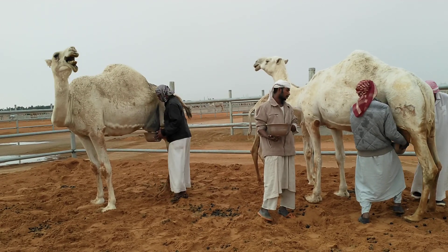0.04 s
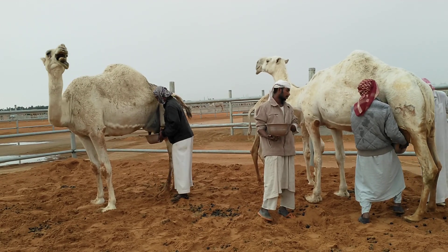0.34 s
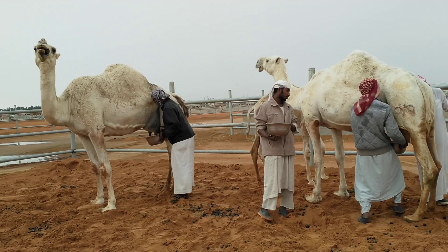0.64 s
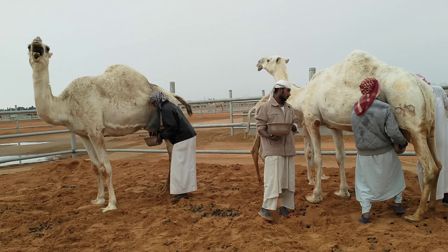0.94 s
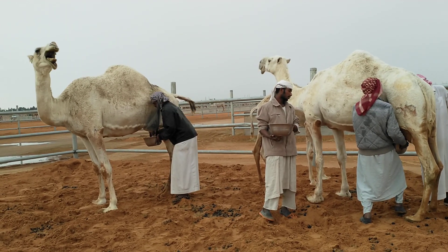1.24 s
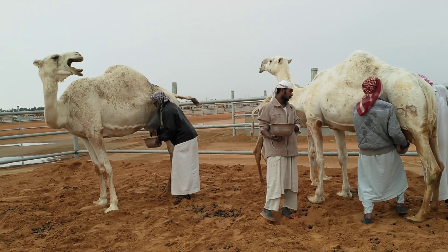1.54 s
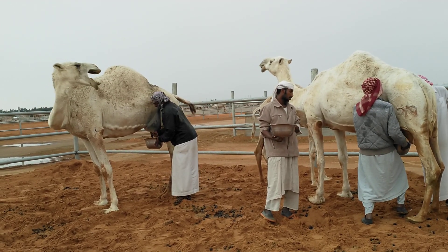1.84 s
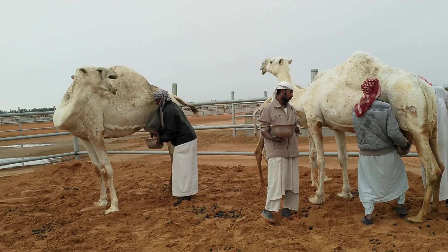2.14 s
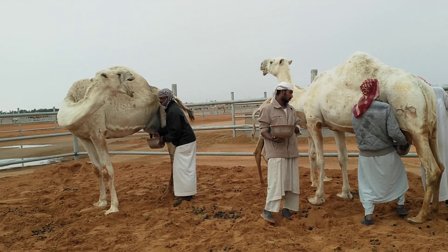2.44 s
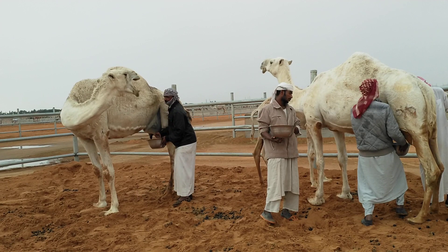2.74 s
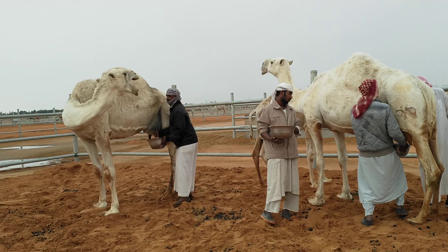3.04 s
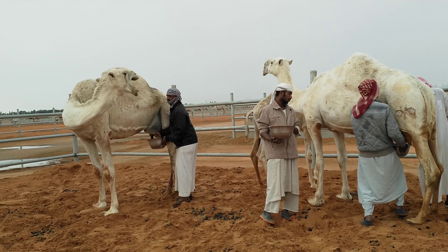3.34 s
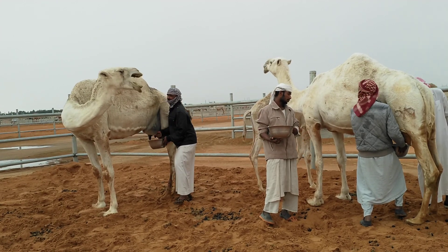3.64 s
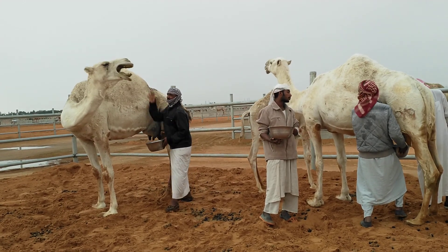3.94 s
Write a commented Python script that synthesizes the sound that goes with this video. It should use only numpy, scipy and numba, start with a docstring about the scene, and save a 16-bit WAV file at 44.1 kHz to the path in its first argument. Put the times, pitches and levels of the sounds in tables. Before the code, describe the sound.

A camel groans low and raspy, close and slightly left, fading by 0.7 seconds. A distant bird chirps faintly in the pause. At about 1.2 seconds the camel groans again, rising a little in pitch, and from 2 seconds breaks into a louder gargling, gulping bellow that smooths out just before 4 seconds. Faint rustles and ticks of gear come near the end, with light wind rumbling throughout.

```python
"""A camel groans twice in an open sandy pen; the second groan breaks into a loud gargling bellow
as it bends its neck back. Vocal-fold pulses, even at first and then chaotic, ring the moving
resonances of its long throat, and air rasps with each pulse. It stands left of centre, with a short
scatter off the pen. Behind it a small bird chirps, gear rustles and ticks, and light wind rumbles."""
import sys
import numpy as np
from scipy import signal
from scipy.fft import rfft, irfft
from scipy.io import wavfile
from scipy.ndimage import uniform_filter1d, map_coordinates
from numba import njit

SR = 44100
rng = np.random.default_rng(int(sys.argv[2]) if len(sys.argv) > 2 else 0)


def digitize_waveform(pressure):
    """Quantize a signal to 16-bit integers and store it at the path in sys.argv[1].

    Rows of a 2-D input are taken as channels; values are limited to [-1, 1].
    """
    field = np.atleast_2d(pressure).T
    bounded = np.clip(field, -1, 1)
    quanta = np.round(bounded * 32767).astype(np.int16)
    wavfile.write(sys.argv[1], SR, quanta)


N = 176400
T = np.arange(N) / SR

# pitch of the vocal folds: t/s, f/Hz
FOLD_PITCH = [(0, 96.84), (.126, 94.45), (.326, 100.1), (.444, 101.7), (.504, 100.9), (.554, 97.5),
              (.6, 91.76), (1.18, 74.76), (1.23, 81.6), (1.28, 90.9), (1.34, 95.7), (1.38, 104.4),
              (1.48, 105.8), (1.694, 105.6), (1.84, 100.5), (2.1, 99.97), (2.5, 88.1), (3.7, 88.64),
              (3.85, 87.84), (4, 86.3)]
# grit of the folds: t/s, roughness/0-1
FOLD_ROUGHNESS = [(0, .008), (.57, .008), (.62, .6), (1.15, .6), (1.19, .15), (1.34, .2), (1.38, .012),
                  (1.69, .012), (1.72, .25), (1.9, .35), (1.97, .5), (2.01, .2), (2.12, .3), (2.25, 1),
                  (3.68, .9), (3.8, .18), (3.92, .07), (4, .05)]
# gulps, where the folds catch and burst open: t/s, pulse accent/dB, first-formant boom/dB
GULP_HITS = [(1.989, 4, -2.5), (2.301, 1.5, -1), (2.378, 3, 2), (2.505, 1, 1), (2.564, 8, -3.5),
             (2.677, 1, -3.5), (2.805, 3, -5), (2.898, 4.5, 0), (3.181, 1.5, 3), (3.318, -0.5, 6.5),
             (3.402, 0, 4.5), (3.463, 4, -8.5), (3.585, 0.5, 2), (3.608, -4, 8), (3.678, 3.5, 3.5)]
# glide of the four throat formants: t/s, f1/Hz, f2/Hz, f3/Hz, f4/Hz
FORMANT_GLIDE = [(0, 293, 716, 1154, 1347), (.2, 304, 706, 1148, 1350), (.4, 308, 719, 1140, 1283),
                 (.56, 285.2, 673, 1102, 1244), (1.2, 350, 691, 1160, 1413), (1.3, 363, 749, 1120, 1369),
                 (1.42, 384, 760, 1141, 1296), (1.67, 386.2, 789, 1218, 1473), (1.8, 420, 794, 1235, 1410),
                 (2.05, 459, 807, 1124, 1286), (2.2, 440, 822, 1142, 1206), (2.4, 417, 860, 1130, 1310),
                 (2.5, 434, 820, 1137, 1275), (3.3, 438.5, 848, 1152, 1310), (3.7, 447, 845, 1153, 1287),
                 (3.85, 404, 813, 1154, 1340), (4, 363, 690, 1175, 1410)]
# their shapes, a row each: width/Hz, skirt/Hz, gain/dB
FORMANT_SHAPES = [(49.7, 1500, 2.5), (63, 250, 3.5), (63.6, 85, -3), (68, 430, -5)]
# extra throat resonances that open in the gargle: f/Hz, width/Hz, skirt/Hz, gain/dB
GARGLE_FORMANTS = [(440, 39, 200, -11), (500, 13, 440, -6.5), (692, 150, 97, -11.5)]
# upper throat resonances: f/Hz, width/Hz, gain/dB
UPPER_FORMANTS = [(1834, 120, 0.5), (2156, 71, -7)]
# faders of the calls: t/s, formant 1/dB, formant 2/dB, formants 3 and 4/dB, upper formants/dB, rasp/dB
GROAN_1_FADERS = [(0.0, -34.5, -41, -32.5, -59.5, -66), (0.114, -39, -41, -36, -54.5, -68.5),
                  (0.438, -32.5, -33, -31.5, -48, -65), (0.526, -31.5, -34.5, -34.5, -49, -60.5),
                  (0.574, -36, -43, -34, -50, -59), (0.608, -42.5, -51, -59, -68, -65),
                  (0.66, -55, -61.5, -53, -66, -66.5), (0.7, -73, -77, -69, -82, -83)]
GROAN_2_FADERS = [(1.1, -85, -72, -84, -94, -88), (1.15, -62, -54.5, -59, -93, -102),
                  (1.196, -40, -42, -38, -52, -76), (1.256, -39, -37, -33.5, -58.5, -62.5),
                  (1.414, -32.5, -33.5, -27.5, -59, -60), (1.524, -34, -31.5, -28.5, -56.5, -65.5),
                  (1.778, -33.5, -32, -35.5, -68.5, -61.5), (1.898, -30.5, -34.5, -38.5, -51, -64),
                  (2.02, -25.5, -27.5, -36.5, -57, -65)]
BELLOW_FADERS = [(2.06, -26.5, -26, -37.5, -55, -62.5), (2.188, -25.5, -30.5, -40, -55, -61.5),
                 (2.286, -29.5, -38.5, -52.5, -58, -62), (2.302, -24, -29.5, -52, -55.5, -59),
                 (2.422, -26.5, -39, -48.5, -56.5, -61), (2.448, -28, -36, -45, -45, -60),
                 (2.476, -28, -30, -45.5, -63, -61.5), (2.508, -21, -31.5, -41.5, -51, -59),
                 (2.53, -24, -31.5, -47.5, -55, -58), (2.82, -23.5, -32, -37, -53.5, -59),
                 (2.918, -23.5, -32.5, -40, -55.5, -57.5), (3.296, -25, -32.5, -38.5, -59, -62),
                 (3.642, -25, -34.5, -40, -58, -62.5), (3.87, -29, -32, -35, -54.5, -62.5),
                 (4.0, -29.5, -30.5, -30.5, -57, -60)]
# EQ of the mouth, before and after the neck bends: f/Hz, gain/dB
MOUTH_EARLY_EQ = [(1410, -29), (2400, -4.5), (2690, -15.5), (3260, -0.5), (3860, -8), (3980, -27),
                  (4170, -11.5), (5450, 6), (6020, -5), (6710, -2), (7300, -16.5), (8000, -12),
                  (8700, -18.5), (13500, -26.5), (15000, -21.5)]
MOUTH_BENT_EQ = [(1410, -16), (2400, 7), (2840, -4.5), (3070, -6), (3260, 1.5), (3470, -11.5), (3800, -3.5),
                 (4200, -8), (5090, -7.5), (5540, -11.5), (6020, -7.5), (6550, -3.5), (7700, -11.5),
                 (9610, -15.5), (11000, -26.5), (14100, -25), (15000, -22)]
# start and end of the crossfade between the two: t/s
MOUTH_CROSSFADE = [1.58, 2.5]
# narrow wandering mouth resonances: f/Hz, width/Hz, level against the rasp/dB
MOUTH_PEAKS = [(2700, 400, -9), (4050, 600, -19), (5700, 250, -15)]
# brief rings of mouth and throat: t/s, length/s, f/Hz, width/Hz, level/dB
CROAK_HITS = [(0.487, 0.093, 5580, 400, -56), (1.18, 0.07, 2440, 170, -46), (1.173, 0.11, 3025, 390, -53),
              (1.193, 0.22, 4640, 260, -60.5), (1.3, 0.25, 6200, 900, -59.5),
              (1.601, 0.24, 5200, 1800, -59), (1.253, 0.042, 374, 72, -30.5), (2.1, 0.17, 2500, 270, -54.5),
              (3.3, 0.053, 2750, 300, -56.5)]
# head position: t/s, left bass lead/ms, left treble lead/ms, treble L-R/dB, turned away/0-1
HEAD_PATH = [(0, 0.2, 0.26, 7, 0.69), (.6, 0.22, 0.22, 8, 0.7), (1.3, 0.21, 0.24, 6.5, 0.1),
             (1.7, 0.12, 0.32, 4.5, 0.43), (2.2, 0.073, 0.21, 3, 1), (3.72, 0.051, 0.2, 2.5, 1),
             (4, 0.14, 0.19, 3, 0.5)]
# bird chirps: t/s, length/s, start f/Hz, end f/Hz, level/dB
BIRD_NOTES = [(.69, .08, 4400, 3200, -78), (.98, .09, 3350, 3500, -84), (1.06, .065, 3500, 2350, -76)]
# rustles and ticks of gear: t/s, length/s, f/Hz, width/Hz, level/dB
GEAR_HITS = [(3.275, .075, 13600, 2200, -67), (3.703, .005, 7600, 1300, -51), (2.872, .025, 4050, 600, -57),
             (3.817, .004, 4500, 1900, -53)]
# EQ of the distant air and of the wind: f/Hz, gain/dB
AIR_EQ = [(88, -30.5), (150, -5.5), (229, -6), (416, -13), (687, -10.5), (1700, -28.5), (2020, -24.5),
          (2650, -33), (10800, -47), (15000, -43)]
WIND_EQ = [(20, -19), (42, -4), (70, -0.5), (110, -5.5), (170, -16), (300, -20.5)]
# wind fader: t/s, level/dB
WIND_FADER = [(0, -46), (.3, -53), (.7, -52), (.9, -56.5), (1.15, -51), (1.4, -52), (2.3, -51), (3.2, -56),
              (4, -47)]


def camel():
    """Fold pulses and puffs of air ring the throat and chest and rasp through the mouth."""
    fade_s, silent_db = .065, -93
    breath_db, throat_db, rasp_db, chest_db = -27, .5, 4.5, -25.5  # trims
    (pitch,), (rough,), turned = curve(FOLD_PITCH), curve(FOLD_ROUGHNESS), curve(HEAD_PATH)[3]
    pause_s = GROAN_1_FADERS[-1][0] + fade_s, GROAN_2_FADERS[0][0] - fade_s
    pause = [(t,) + (silent_db,) * 5 for t in pause_s]
    *formant_levels, rasp_level = undb(curve([*GROAN_1_FADERS, *pause, *GROAN_2_FADERS, *BELLOW_FADERS]))
    pulses, puff = folds(pitch, rough)
    source = unit(pulses + flaps(rough))
    source += undb(breath_db) * (1 + 16 * rough) * puff * noise()
    body = throat(source, formants(formant_levels, rough, turned))
    rasp = (1 - turned) * unit(pulses) + (puff + .5 * turned ** 2) * noise()
    return (undb(throat_db) * body + croaks(source)
            + undb(rasp_db) * rasp_level * mouth(rasp, turned)
            + undb(chest_db) * formant_levels[0] * chest(source, turned))


def folds(pitch, rough):
    """One pulse and one puff of air a cycle; roughness scatters timing and force, gulps catch a pulse."""
    jitter, shimmer_db, catch_s, puff_s = .19, 1.6, .009, .005
    pulses, at, gulps = np.zeros(N + 16), 0., list(GULP_HITS)
    for slip, force in rng.standard_normal((700, 2)):
        if at >= N:
            break
        db = shimmer_db * rough[int(at)] * min(force, 1.5)
        if gulps and at / SR > gulps[0][0] - catch_s:
            start, db, _ = gulps.pop(0)
            at = start * SR
        i = int(at)
        click = np.sinc(np.arange(16) - 7 - at + i) * np.hanning(16)  # lands between samples
        pulses[i:i + 16] += undb(db) * click
        at += SR / pitch[min(i + 220, N - 1)] * np.exp(jitter * rough[i] * slip)
    puff = signal.lfilter([1], [1, -np.exp(-1 / (SR * puff_s))], pulses[:N])
    return pulses[:N], unit(puff)


def flaps(rough, per_s=150, size=.33):
    """Loose throat tissue slaps at random between the pulses where the voice is rough."""
    return size * rough ** 2 * (rng.random(N) < per_s / SR)


def formants(levels, rough, turned):
    """Throat resonances as (centre, width, skirt, level): gargling wobbles them, gulps shift the boom."""
    wobble, wobble_per_s, gulp_s, upper_trim_db = .035, 28, .014, 3
    first, second, third, upper = levels
    boom = undb(sum(db * (np.abs(T - t) < gulp_s / 2) for t, _, db in GULP_HITS))
    damping = 1 + .6 * (1 - turned)  # an open mouth facing out widens the resonances
    faders = first * boom, second, third, third
    rings = []
    for hz, (width, skirt, db), fader in zip(curve(FORMANT_GLIDE), FORMANT_SHAPES, faders):
        centre = hz * (1 + wobble * rough * walk(wobble_per_s))
        rings.append((centre, width * damping, skirt, undb(db) * fader))
    for hz, width, skirt, db in GARGLE_FORMANTS:
        rings.append((hz, width, skirt, undb(db) * first * np.maximum(turned, .4)))
    for hz, width, db in UPPER_FORMANTS:
        rings.append((hz, width * (1 + 1.9 * rough), 240, undb(upper_trim_db + db) * upper))
    return rings


def throat(source, rings):
    """One long tube with moving resonances: each pulse starts them all at once, and the lows trail."""
    hop, size = 294, 4096
    low_edge, high_edge = .83, 1.434  # passband of a resonance, as ratios of its centre
    f = np.fft.rfftfreq(size, 1 / SR) + 1
    per_frame = lambda v: (v + np.zeros(N))[hop // 2::hop, None]
    bell = lambda hz, width: 1 / (1 + ((f * f - hz * hz) / (f * width)) ** 2)
    power = 0
    for hz, width, skirt, level in rings:
        gain = per_frame(level / slow_level(resonate(source, hz, width, skirt)))
        centre = per_frame(hz)
        edges = 1 + (low_edge * centre / f) ** 12 + (f / (high_edge * centre)) ** 12
        power += gain ** 2 * bell(centre, per_frame(width)) * bell(centre, per_frame(skirt)) / edges
    # minimum phase keeps the attack sharp, with all the ringing after it
    floor = 3e-9 * power.max(axis=1, keepdims=True)
    cepstrum = irfft(np.log(power + floor))[:, :size // 2]
    cepstrum[:, 0] /= 2
    response = np.exp(rfft(cepstrum, size))
    frames = irfft(rfft(source.reshape(-1, hop), size) * response)
    out = np.zeros(N + size)
    for k, frame in enumerate(frames):
        out[k * hop:k * hop + size] += frame
    return out[:N]


def mouth(rasp, turned):
    """The rasp morphs between two mouth shapes; narrow peaks wander in it as the neck bends."""
    drift, swing_db, per_s = .02, 4, 7
    blend = np.interp(T, MOUTH_CROSSFADE, [0, 1])
    hiss = (1 - blend) * steady(colour(rasp, MOUTH_EARLY_EQ))
    hiss += blend * steady(colour(rasp, MOUTH_BENT_EQ))
    for hz, width, db in MOUTH_PEAKS:
        centre = hz * (1 + drift * walk(per_s))
        level = turned ** 3 * undb(db + swing_db * walk(per_s))
        hiss += level * steady(resonate(rasp, centre, width, skirt=830))
    return steady(hiss)


def croaks(source):
    """Single mouth and throat resonances ring out briefly."""
    return sum(undb(db) * swell(start, length) * steady(resonate(source, hz, width, width))
               for start, length, hz, width, db in CROAK_HITS)


def chest(source, turned):
    """A low chest resonance adds weight and rises as the head turns away."""
    return steady(resonate(source, hz=100 + 60 * turned ** 4, width=72, skirt=100))


def place_left(voice, shadow_hz=600, split_hz=1210):
    """The voice arrives earlier and brighter on the left; bass and treble have their own delays."""
    bass_ms, treble_ms, pan_db, _ = curve(HEAD_PATH)
    below = lambda x, hz, order: signal.sosfiltfilt(signal.butter(order, hz, fs=SR, output="sos"), x)
    delay = lambda x, ms: map_coordinates(x, [(T - ms / 1000) * SR], mode="nearest")
    low = below(voice, shadow_hz, order=1)
    left, right = (low + (voice - low) * undb(side * pan_db / 2) for side in (1, -1))
    bass = below(right, split_hz, order=3)
    return np.array([left, delay(bass, bass_ms) + delay(right - bass, treble_ms)])


def pen(x, wet_db=-6, treble_db=9, t60_s=.087):
    """Scatter from rails and animals: bright and wide on top, centred in the bass."""
    decay = undb(-60 * T / t60_s) * np.clip(T / .003, 0, 1)
    bass = cut(noise(), 720, "low")
    tails = [decay * (bass + undb(treble_db) * cut(noise(), 920, "high")) for _ in range(2)]
    return undb(wet_db) * np.array([signal.fftconvolve(x, t / np.linalg.norm(t))[:N] for t in tails])


def bird():
    """Thin, wavering whistles glide far off."""
    out = np.zeros(N)
    for start, length, start_hz, end_hz, db in BIRD_NOTES:
        level = undb(db + 3.9 * walk(93)) * swell(start, length)
        hz = np.interp(T, [start, start + length], [start_hz, end_hz]) * (1 + .014 * walk(330))
        out += level * np.sin(2 * np.pi * np.cumsum(hz) / SR)
    return out


def gear():
    """Gear rustles and ticks in short, bright bursts of noise."""
    return sum(undb(db) * swell(start, length) * unit(resonate(noise(), hz, width, width))
               for start, length, hz, width, db in GEAR_HITS)


def outdoors(air_db=-61.5):
    """A near-mono bed of distant air under a low, fluttering wind."""
    shared = noise()
    air = np.array([unit(colour(shared + .37 * noise(), AIR_EQ)) for _ in range(2)])
    air *= undb(air_db + walk(7.4))
    gusts = undb(curve(WIND_FADER)[0] + 2 * walk(24))
    return air + gusts * unit(colour(noise(), WIND_EQ))


def undb(db):
    return 10 ** (np.asarray(db) / 20)


def curve(rows):
    """One automation lane for each column after the time."""
    times, *columns = np.array(rows, float).T
    return [np.interp(T, times, column) for column in columns]


def swell(start, length):
    """A rounded envelope with quick edges."""
    return np.sqrt(np.abs(np.sin(np.pi * np.clip((T - start) / length, 0, 1))))


def unit(x):
    return x / np.sqrt(np.mean(x ** 2))


def slow_level(x, size=2400):
    """RMS level over several pulses."""
    return np.sqrt(np.abs(uniform_filter1d(uniform_filter1d(x * x, size), size)) + 1e-18)


def steady(x):
    """Ride the slow level to 1, keeping the single pulses."""
    return x / slow_level(x)


def noise():
    return rng.standard_normal(N)


def walk(per_s):
    """Smooth random drift with an RMS of 1."""
    step = int(SR / per_s)
    held = np.repeat(rng.standard_normal(N // step + 1), step)
    return unit(uniform_filter1d(held, step)[:N])


@njit
def svf(x, hz, width):
    """State-variable band-pass, gain 1 at the centre."""
    y, band_state, low_state = np.empty(len(x)), 0., 0.
    for i in range(len(x)):
        g, damping = np.tan(np.pi * hz[i] / SR), width[i] / hz[i]
        band = (band_state + g * (x[i] + 1e-18 - low_state)) / (1 + g * (g + damping))
        band_state = 2 * band - band_state
        low_state += 2 * g * band
        y[i] = damping * band
    return y


def resonate(x, hz, width, skirt):
    """Two band-passes in series on one centre; their bandwidths are width and skirt, in Hz."""
    hz, width, skirt = (v + np.zeros(N) for v in (hz, width, skirt))
    return svf(svf(x, hz, width), hz, skirt)


def cut(x, hz, kind):
    return signal.sosfilt(signal.butter(2, hz, kind, fs=SR, output="sos"), x)


def colour(x, points):
    """EQ through (f/Hz, gain/dB) points, falling steeply outside them."""
    hz, db = np.array(points, float).T
    log_f = np.log(np.fft.rfftfreq(N, 1 / SR) + 1)
    outside = np.maximum(np.log(hz[0]) - log_f, 0) + np.maximum(log_f - np.log(hz[-1]), 0)
    return irfft(rfft(x) * undb(np.interp(log_f, np.log(hz), db) - 90 * outside), N)


def scene():
    """Camel up front, camel and bird scattering off the pen, gear and wind behind."""
    voice, chirps = camel(), bird()
    return place_left(voice) + chirps + pen(voice + chirps) + gear() + outdoors()


def record(dry, fade_s=.004, top_hz=15700):
    """Quick fades at both ends and a steep high cut."""
    fades = np.clip(np.minimum(T, T[-1] - T) / fade_s, 0, 1)
    return signal.sosfilt(signal.ellip(10, .1, 80, top_hz, fs=SR, output="sos"), dry * fades)


dry = scene()
out = record(dry)
digitize_waveform(out)
```